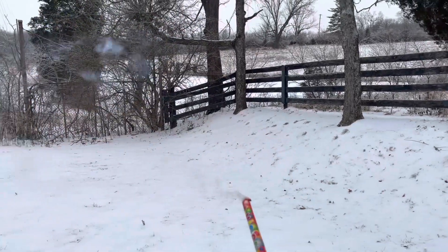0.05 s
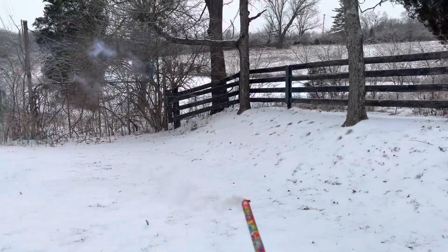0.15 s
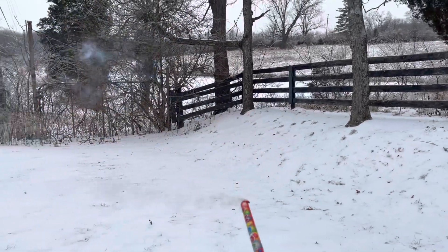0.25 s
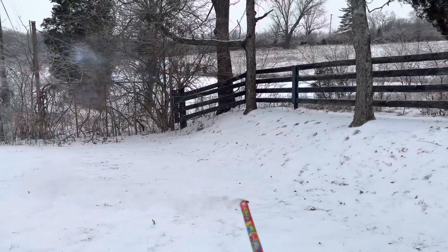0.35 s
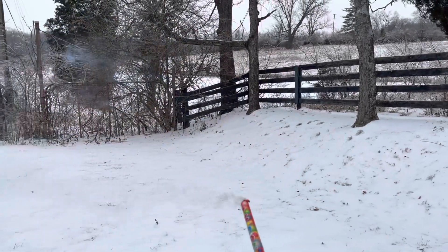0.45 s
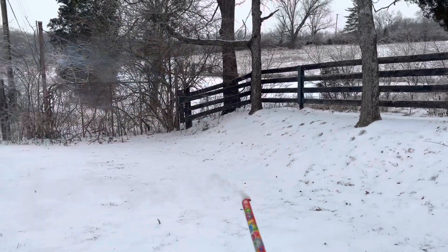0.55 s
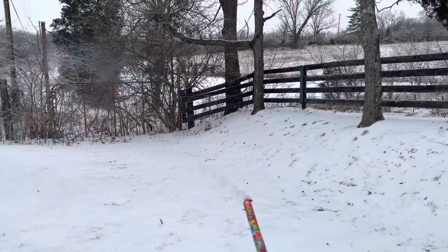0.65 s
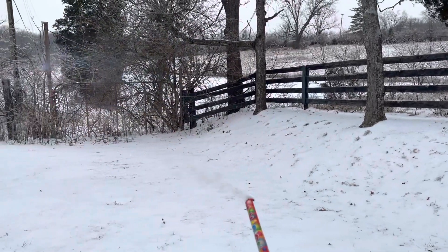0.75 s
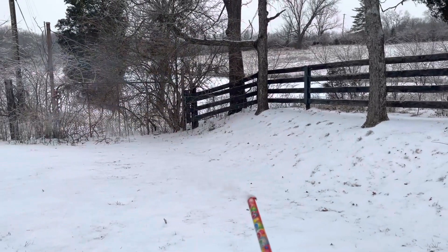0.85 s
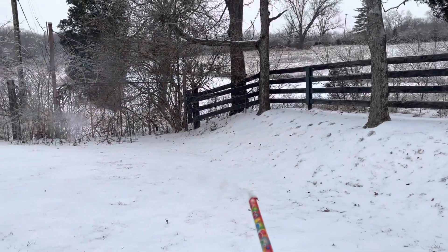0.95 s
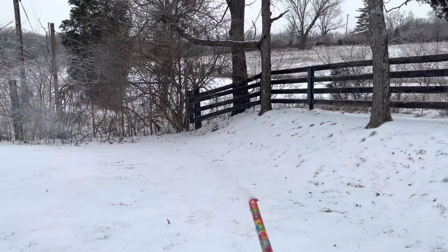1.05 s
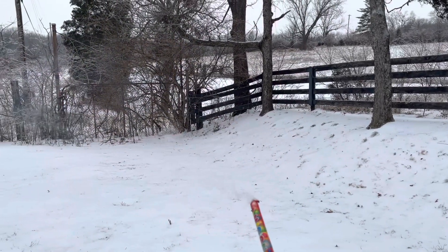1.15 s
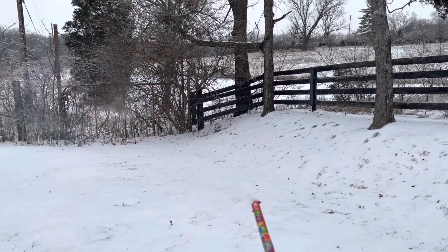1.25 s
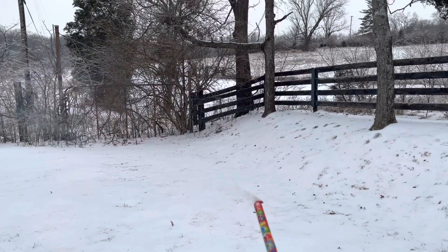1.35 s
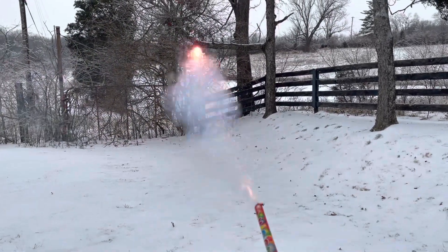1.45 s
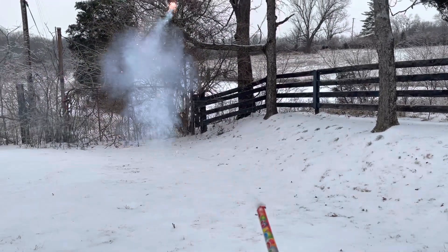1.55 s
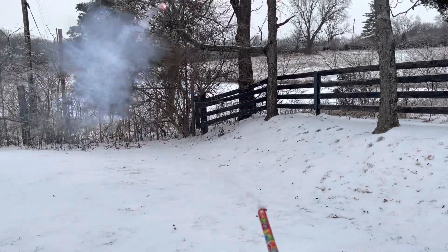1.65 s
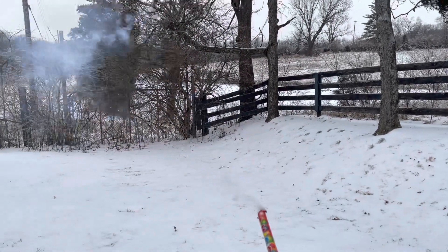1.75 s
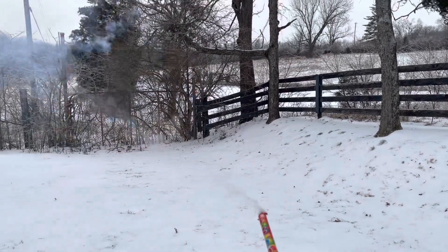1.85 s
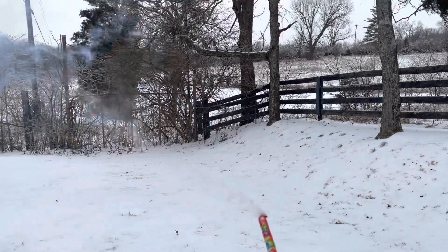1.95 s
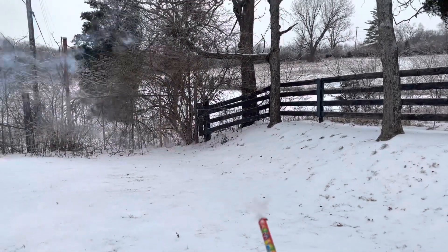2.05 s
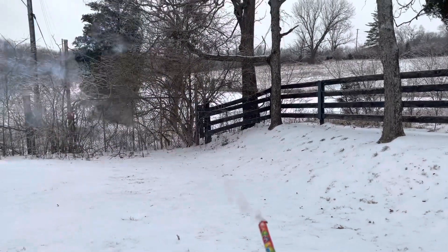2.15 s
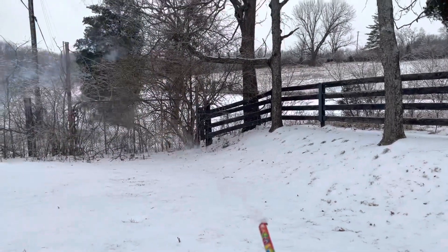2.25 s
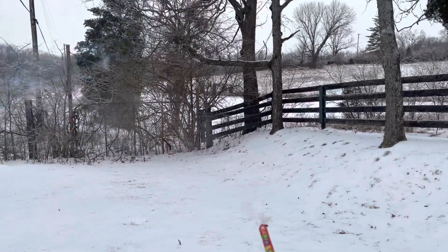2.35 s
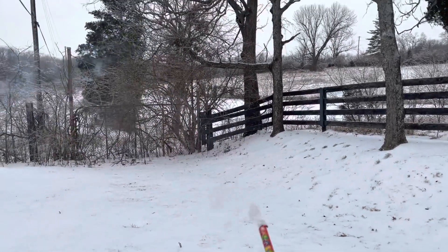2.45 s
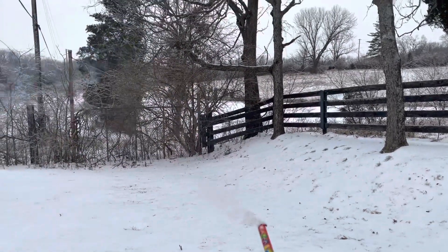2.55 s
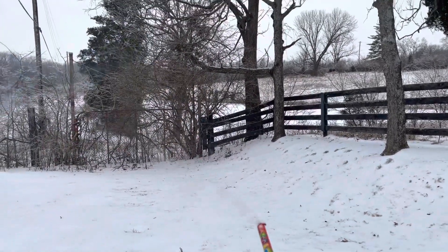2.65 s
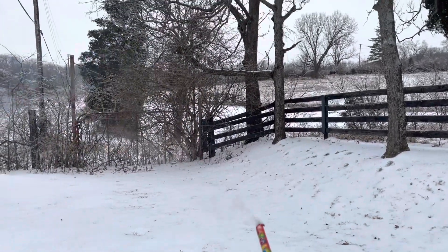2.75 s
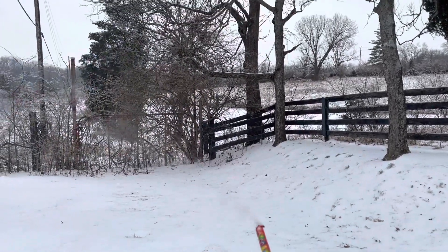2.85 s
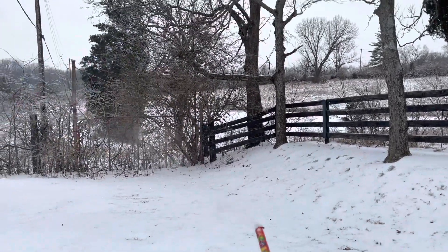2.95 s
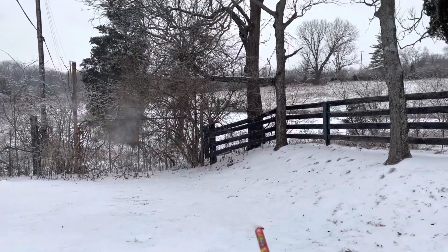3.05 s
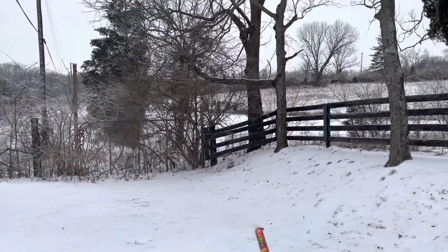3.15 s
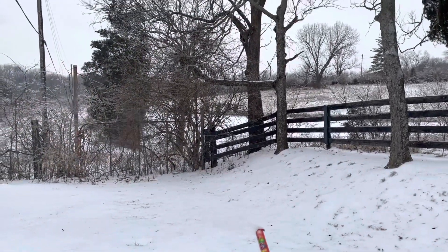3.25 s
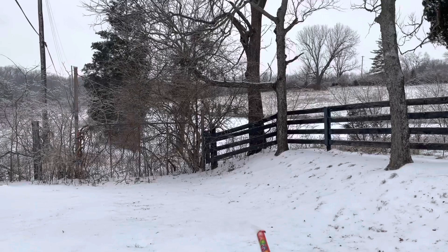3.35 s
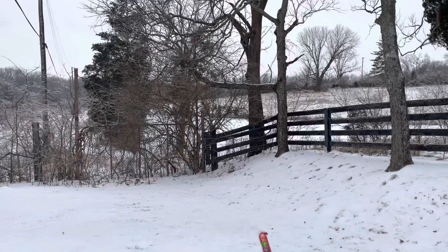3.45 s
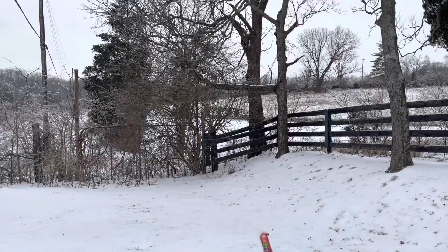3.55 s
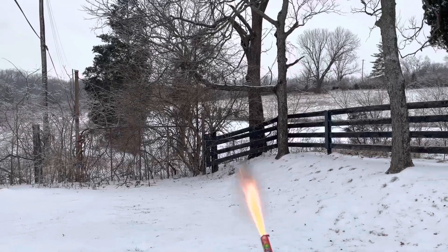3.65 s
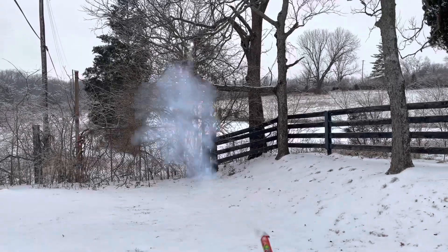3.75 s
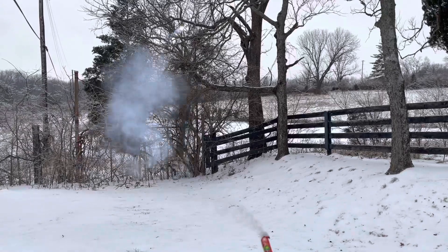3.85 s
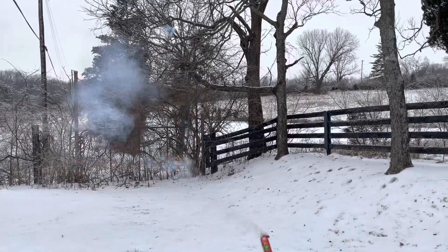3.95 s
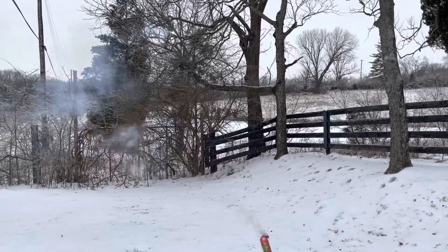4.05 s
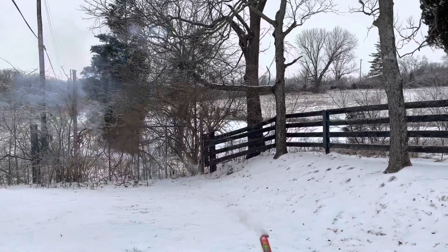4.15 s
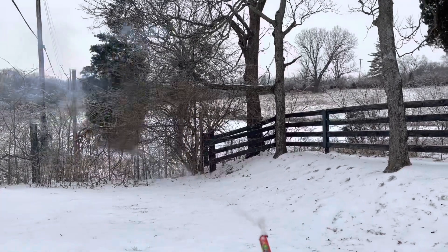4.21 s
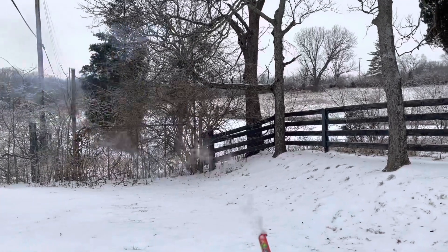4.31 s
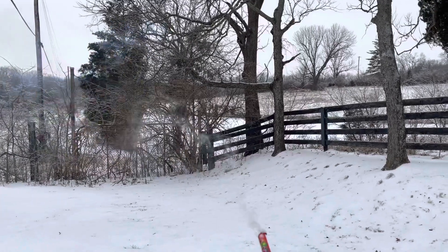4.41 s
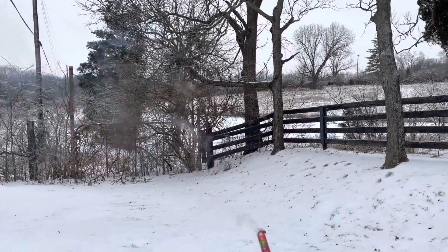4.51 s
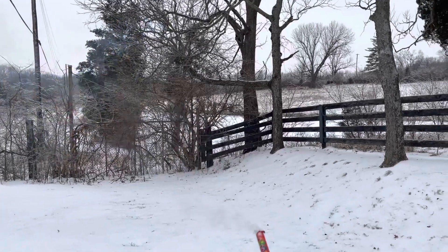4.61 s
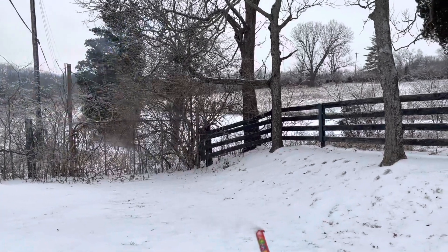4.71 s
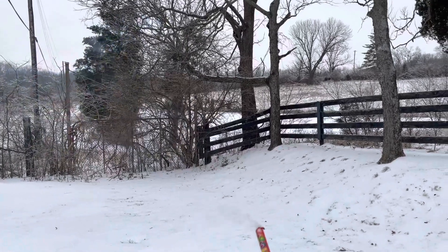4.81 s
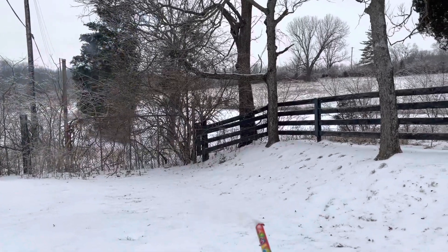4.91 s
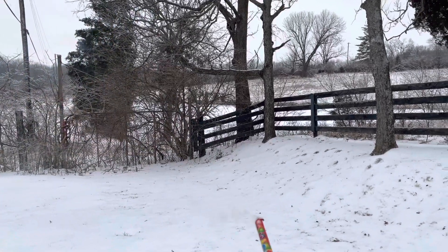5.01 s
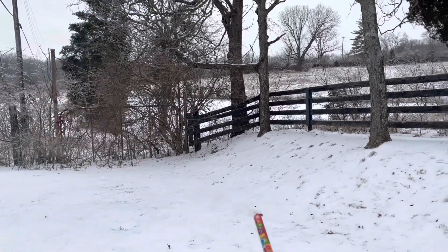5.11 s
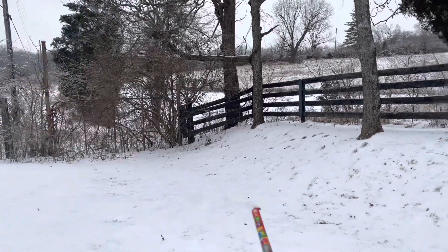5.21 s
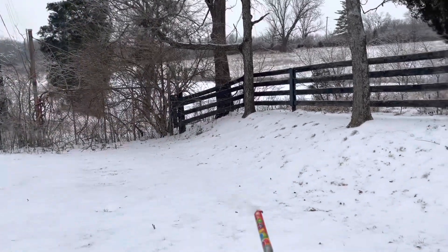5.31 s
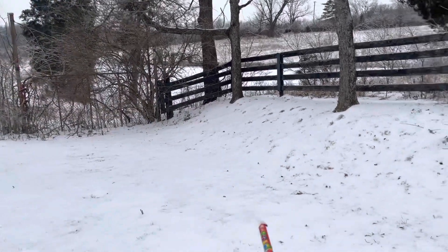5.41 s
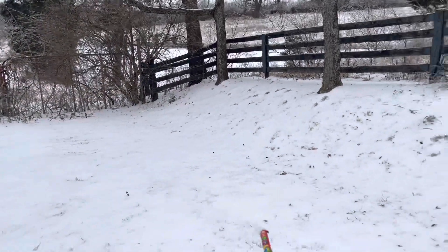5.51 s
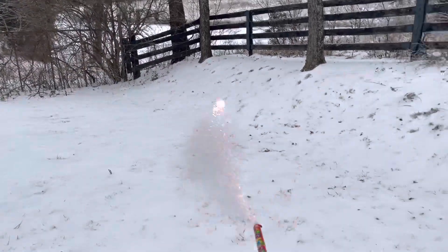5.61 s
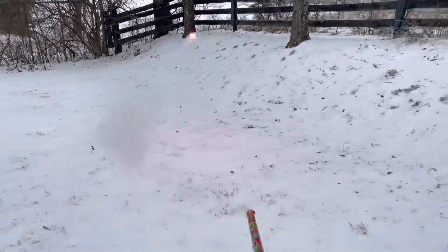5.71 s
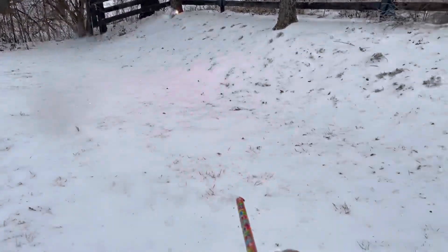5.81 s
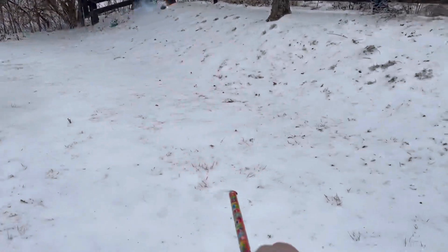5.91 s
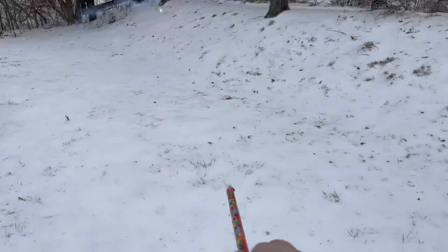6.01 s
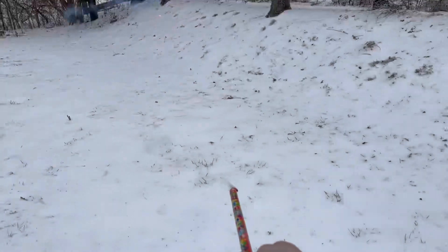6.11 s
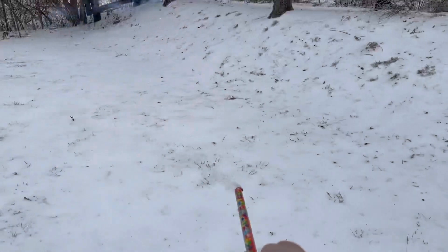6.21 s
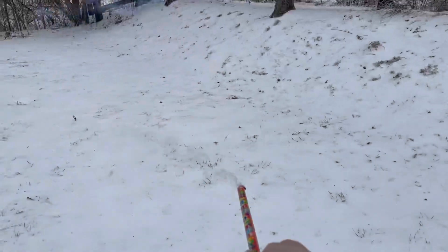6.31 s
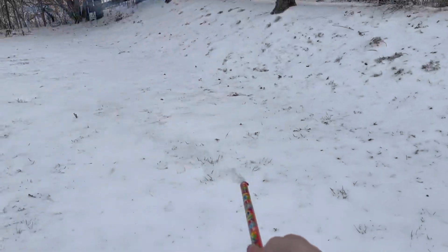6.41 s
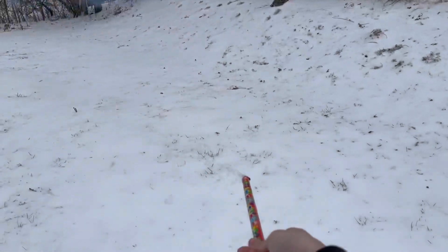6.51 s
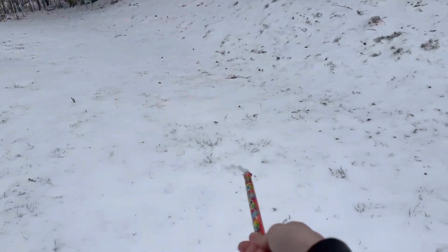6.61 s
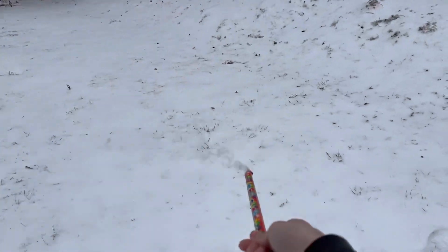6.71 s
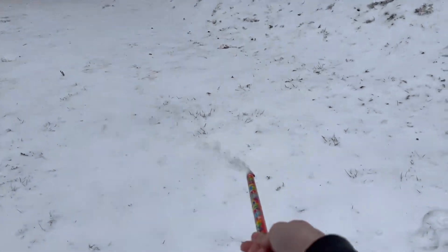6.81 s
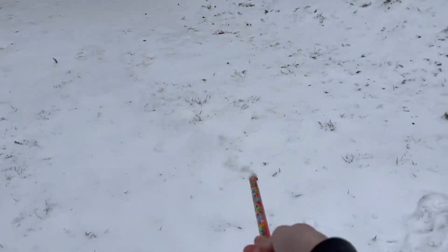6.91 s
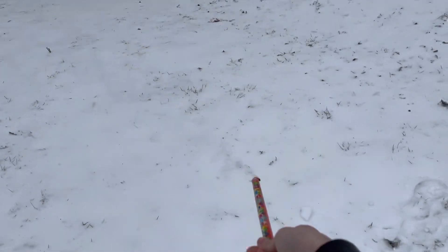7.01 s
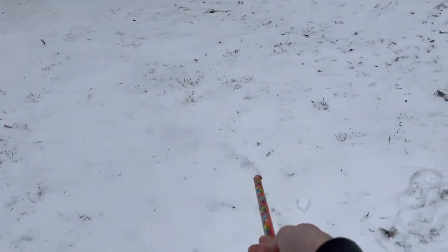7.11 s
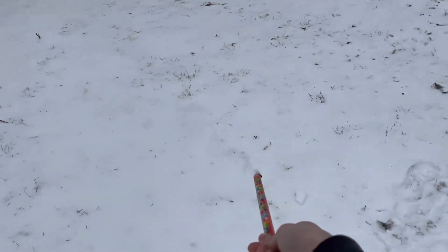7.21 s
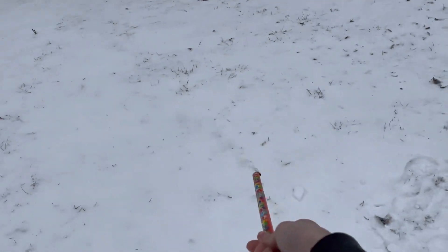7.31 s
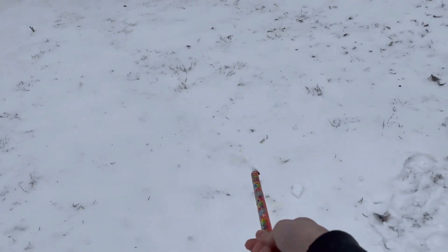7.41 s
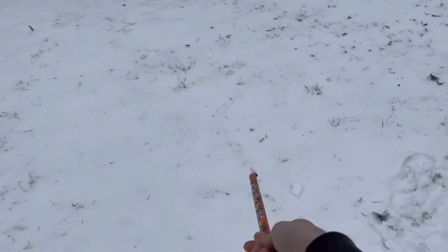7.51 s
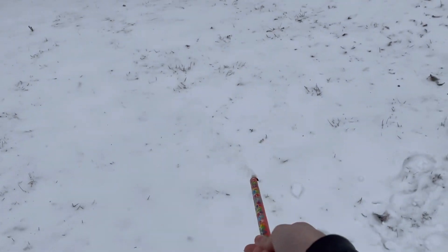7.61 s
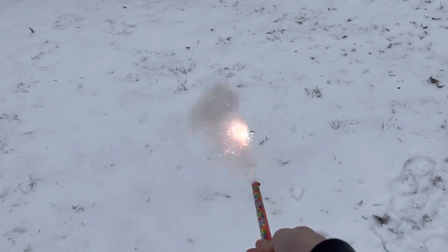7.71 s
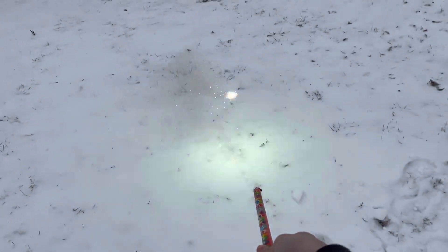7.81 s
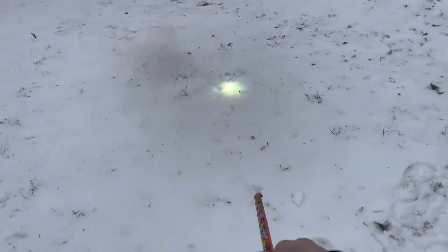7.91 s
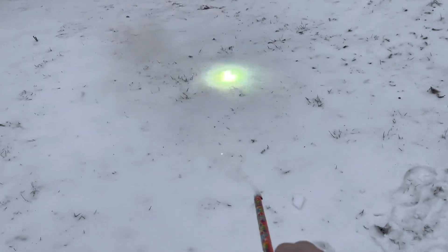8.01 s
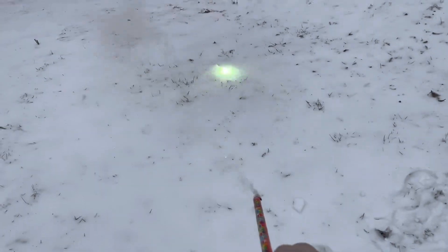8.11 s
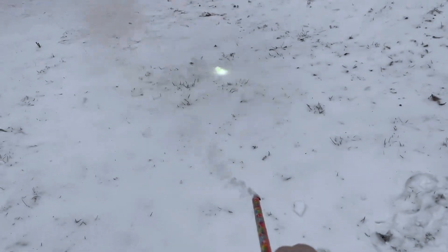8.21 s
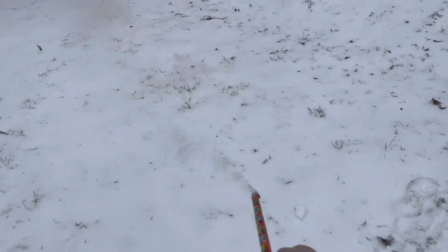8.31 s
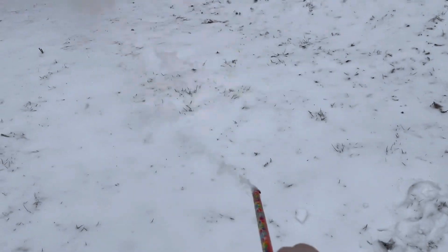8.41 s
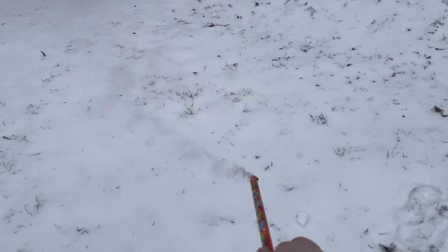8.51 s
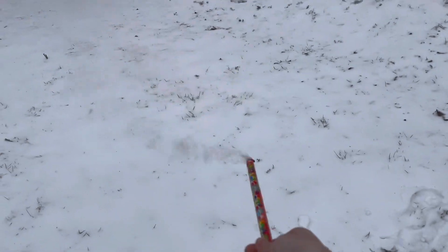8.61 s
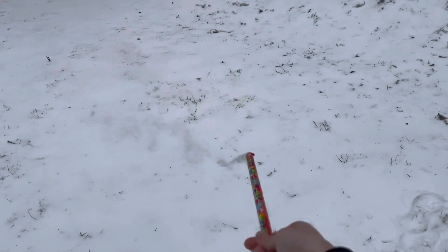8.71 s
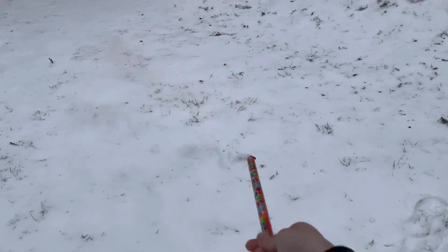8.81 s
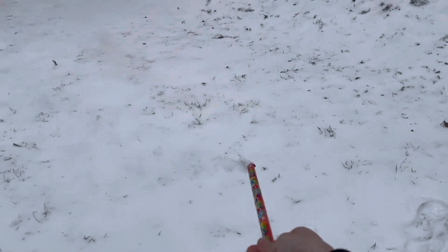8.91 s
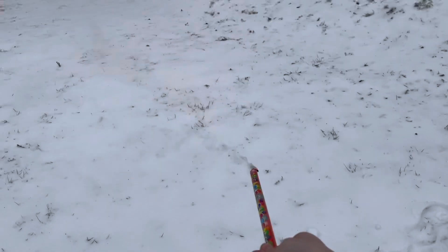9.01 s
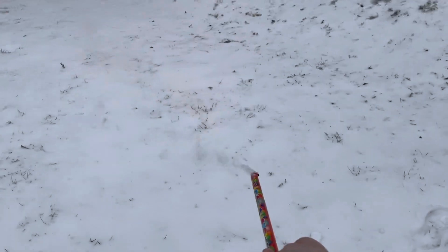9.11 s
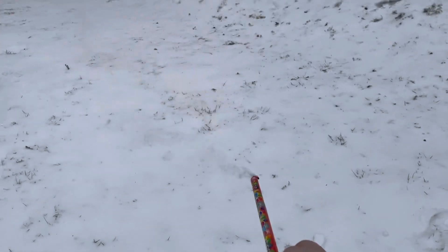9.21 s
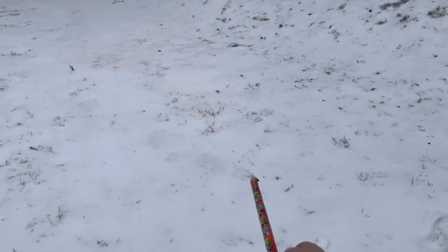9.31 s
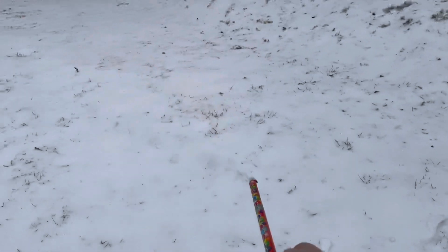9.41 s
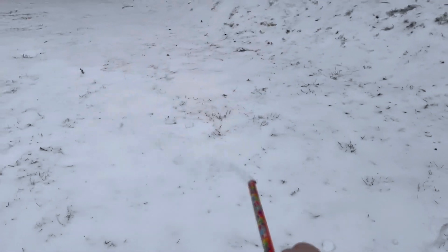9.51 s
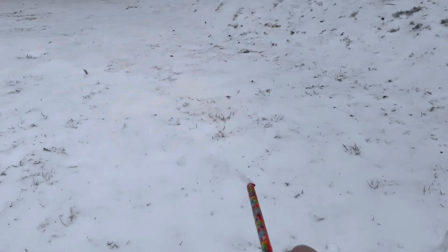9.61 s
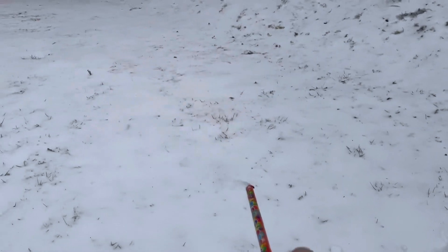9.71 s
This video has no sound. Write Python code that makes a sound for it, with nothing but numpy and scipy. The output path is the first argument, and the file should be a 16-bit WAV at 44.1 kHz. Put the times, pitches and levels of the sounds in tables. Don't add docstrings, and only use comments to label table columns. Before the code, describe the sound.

Outdoors, five abrupt gas pops about two seconds apart punctuate soft burning hiss and spark clicks, while low wind thumps roll over the microphone.

```python
import sys
import numpy as np
from scipy import signal
from scipy.fft import rfft, irfft, next_fast_len
from scipy.io import wavfile
from scipy.ndimage import uniform_filter1d

SR = 44100
rng = np.random.default_rng(int(sys.argv[2]) if len(sys.argv) > 2 else 0)


def level_to_linear(level):
    exponent = np.asarray(level, float) / 20
    return 10 ** exponent


def file_out(sig):
    cols = np.atleast_2d(sig).T
    lim = np.clip(cols, -1, 1)
    pcm = np.round(lim * 32767).astype(np.int16)
    wavfile.write(sys.argv[1], SR, pcm)


N = 429975
T = np.arange(N) / SR

# frequency in Hz, level in dB.
MIC = [(25, -11), (55, 1.5), (4900, -1), (5500, -4), (6100, -0.5), (8500, 7.5), (11800, -1.5),
       (13800, -1.5), (15500, -3.5), (15900, -21.5), (16400, -59.5)]


def shape(x, gain):
    size = next_fast_len(x.shape[-1])
    hz = np.arange(size // 2 + 1) * SR / size + 1e-3
    return irfft(rfft(x, size) * gain(hz), size)[..., :x.shape[-1]]


def colour(table, hz):
    f, db = np.transpose(table)
    return np.interp(np.log(hz), np.log(f), db)


def band(size, lo_hz, hi_hz, channels=1, table=((1, 0), (2, 0)), order=6):
    full = next_fast_len(size)
    phase = rng.random((channels, full // 2 + 1))
    phase = phase[:, :int(8 * hi_hz * full / SR)]
    f = np.arange(phase.shape[1]) * SR / full + 1
    edges = np.sqrt((1 + (lo_hz / f) ** order) * (1 + (f / hi_hz) ** order))
    gain = level_to_linear(colour(table, f)) / edges
    x = irfft(gain * np.exp(2j * np.pi * phase), full)[:, :size]
    return x / x.std()


def walk(rate):
    k = int(SR / rate)
    steps = np.repeat(rng.standard_normal(N // k + 1), k)
    return 1.5 * uniform_filter1d(steps, k)[:N]


def curve(table):
    return np.interp(T, *np.transpose(table))


def bump(s, half):
    out = np.zeros(N)
    near = slice(max(int((s - 4 * half) * SR), 0), int((s + 4 * half) * SR))
    out[near] = np.exp(-((T[near] - s) / half) ** 2)
    return out


def add(out, s, x):
    i = int(s * SR)
    out[..., i:i + x.shape[-1]] += x[..., :N - i]


def fire():
    # start in seconds, star level in dB, star fade in dB per second,
    # burning time in seconds, fuse level in dB.
    stars = [
        (-.7, -72, 12, .3, -66),
        (1.34, -63, 15, .6, -66),
        (3.6, -62, 24, .85, -71),
        (5.52, -67, 10, 1.08, -65),
        (7.62, -61, 15, .64, -69),
    ]
    # time in seconds, lift in dB, half length in seconds, brightness in dB.
    flares = [(.45, 2, .03, 4), (.67, 4, .03, 1), (.96, 7, .04, 3), (1.6, 2, .06, 0), (1.93, 2, .06, -2),
              (3.87, 2, .05, 0), (4.3, 7, .1, -6), (5.75, -1, .09, 6), (6.0, 0.3, .08, 4), (6.5, 3, .2, -3),
              (7.83, 8, .11, 3), (8.17, 3, .08, 6)]
    burn_out_db_per_s, fuse_fade_db_per_s = 60, 13.8
    star_top_db, star_body_db, fuse_top_db, fuse_body_db = 2.5, 5.5, 6.5, 4.5

    columns = np.transpose(stars)
    latest = np.searchsorted(columns[0], T) - 1
    s, star_db, fade, burning_s, fuse_db = columns[:, latest]
    burnt_out = np.maximum(T - s - burning_s, 0)
    star = level_to_linear(star_db - fade * (T - s) - burn_out_db_per_s * burnt_out)
    fuse = level_to_linear(fuse_db - fuse_fade_db_per_s * (T - s))
    lift_db, bright_db = sum(np.outer([db, tilt_db], bump(at, half)) for at, db, half, tilt_db in flares)
    hiss = np.hypot(star, fuse)
    top = level_to_linear(bright_db) * np.hypot(level_to_linear(star_top_db) * star, level_to_linear(fuse_top_db) * fuse)
    body = level_to_linear(-bright_db) * np.hypot(level_to_linear(star_body_db) * star, level_to_linear(fuse_body_db) * fuse)
    return level_to_linear(lift_db) * np.array([hiss, top, body])


def tube(x):
    # start in seconds, quarter-wave pitch in Hz,
    # seconds until the star's plain hiss gives way to the ringing fuse.
    lengths = [
        (0, 1150, 0),
        (1.33, 960, 0.49),
        (3.58, 855, 0.47),
        (5.511, 718, 0.57),
        (7.601, 632, .7),
    ]
    return_share, dull_hz = .45, 9000
    out = np.zeros(N)
    ends = [row[0] for row in lengths[1:]] + [N / SR]
    for (s, hz, open_s), end in zip(lengths, ends):
        part = x[int(s * SR):int(end * SR)]
        back = lambda f: return_share * np.exp(-(f / dull_hz) ** 2 - 1j * np.pi * f / hz)
        rung = shape(part, lambda f: np.sqrt(1 - abs(back(f)) ** 2) / (1 + back(f)))
        share = np.clip((np.arange(len(part)) / SR - open_s) / 0.37 + .5, 0, 1)
        add(out, s, share * rung + (1 - share) * part)
    return out


def burning():
    # time in seconds, peak level in dB, centre frequency in Hz.
    sparks = [(1.3724, -32.5, 12000), (2.5794, -56, 6570), (5.7309, -24.5, 8000), (6.2667, -44.5, 6900),
              (6.3949, -46, 4510), (7.168, -55, 6040), (7.3094, -56, 5570), (7.7762, -34.5, 12000),
              (8.0162, -38, 6000), (8.6717, -43, 10100), (8.9052, -62.5, 8000), (9.017, -61, 2490),
              (9.5797, -59.5, 9040), (9.662, -56, 13000)]
    snow_delay_s, snow_share = [.0041, .0046], .03
    hiss, top, body = fire()
    flicker = level_to_linear(0.7 * walk(25) + 1.5 * walk(240))
    flame = 1.2 * hiss * band(N, 3700, 9500)[0]
    flame = flame + body * band(N, 1200, 3500)[0]
    flame = flame + top * band(N, 9500, 17000)[0]
    out = tube(flicker * flame)
    click = signal.unit_impulse(256, 64)
    for s, db, hz in sparks:
        spark = shape(click, lambda f: 1 / (1 + (hz / 2.3 / f) ** 4) / (1 + (f / hz / 2.2) ** 4))
        add(out, s - .001, level_to_linear(db + 3.5) * spark / spark.max())
    return shape(out, lambda f: 1 + snow_share * np.exp(-2j * np.pi * np.outer(snow_delay_s, f)))


def buffeting():
    # time in seconds, level in dB.
    gust = [(0.0, -48), (0.94, -55), (1.65, -43), (1.97, -48), (2.19, -64), (2.62, -53), (3.02, -64),
            (4.02, -49), (4.43, -50), (4.73, -59), (5.27, -58), (5.62, -52), (6.05, -58), (8.08, -53),
            (8.32, -58), (8.75, -50), (9.29, -60), (9.7, -54)]
    # time in seconds, rumble in dB, half length in seconds, flutter over rumble in dB.
    puffs = [(.11, -38, .05, -9), (.5, -43, .06, -9), (.67, -42, .03, -9), (1.07, -37, .04, -12),
             (1.43, -39, .03, -15), (1.52, -38, .03, -10), (1.6, -35, .04, -12), (1.8, -32, .025, -12),
             (2.0, -42, .03, -9), (2.16, -35, .04, -17), (2.48, -42, .05, -12), (3.51, -42, .04, -10),
             (4.13, -38, .06, -8), (4.35, -41, .03, -12), (4.43, -42, .03, -12), (4.57, -38, .035, -14),
             (4.95, -47, .04, -7), (5.2, -48, .06, -5), (5.72, -41, .08, -4), (5.88, -44, .03, -5),
             (6.06, -44, .04, -7), (6.33, -41, .05, -9), (6.56, -41, .035, -10), (7.0, -36, .03, -15),
             (7.14, -42, .05, -6), (7.4, -41, .03, -12), (7.96, -38, .045, -10), (8.13, -43, .04, -7),
             (8.56, -41, .05, -13), (8.67, -42, .06, -3)]
    gust_flutter_db = -5.5
    power = np.outer(level_to_linear(np.array([0, gust_flutter_db])), level_to_linear(curve(gust) + 1.5)) ** 2
    for s, db, half, flutter_db in puffs:
        power = power + np.outer(level_to_linear(db + np.array([0, flutter_db])), bump(s, half)) ** 2
    return np.sqrt(power)


def wind():
    # time in seconds, peak level in dB, first pitch in Hz,
    # left minus right in dB.
    slaps = [(0.11, -35, 360, .5), (1.054, -38, 248, 6), (1.219, -34.5, 354, 1), (1.27, -26.5, 400, 2),
             (1.419, -28, 239, 1), (1.620, -28, 437, 3), (1.639, -34, 606, -1.5), (1.671, -26, 789, 7),
             (1.682, -27.5, 501.4, -9), (1.784, -18, 826, 3.5), (1.891, -33.5, 353, 4),
             (1.997, -40, 298, -2), (2.112, -35, 250, -3), (2.49, -38, 250, -1.5),
             (2.685, -40.5, 300, -0.5), (4.097, -28, 219, -0.5), (4.131, -26.5, 294, 2.5),
             (4.169, -31.5, 248, 7), (4.335, -34, 170, -1), (4.414, -33, 201, 1), (4.548, -34, 148, -1),
             (6.307, -37, 253, -2), (7.243, -36, 298, -2), (8.513, -34, 202, 1), (8.856, -28, 370, 3),
             (8.762, -37, 260, 0), (7.55, -37, 280, 0), (8.375, -38, 170, 0), (9.036, -43.5, 398, 3),
             (9.101, -41.5, 498, 0.5)]
    low, high = buffeting()
    share = np.array([[.8, 0.69, 0], [.8, 0, 0.81]])
    rumble = share @ band(N, 38, 100, channels=3) * level_to_linear(2.1 * walk(14))
    flutter = share @ band(N, 130, 300, channels=3) * level_to_linear(2.7 * walk(45))
    out = low * rumble / rumble.std() + high * flutter / flutter.std()
    t = np.arange(SR // 12) / SR
    for s, db, hz, pan_db in slaps:
        turns = np.cumsum(80 + 1.2 * hz * np.exp(-t / .005)) / SR
        swell = np.exp(-t / .017) * (1 - np.exp(-(t / .0022) ** 2))
        slap = np.sin(2 * np.pi * turns) * swell
        sides_db = np.array([[pan_db], [-pan_db]]) / 2
        add(out, s + 0.00077, level_to_linear(db + 1.0 + sides_db) * slap)
    return out


def distance():
    # frequency in Hz, level in dB per Hz.
    traffic = [(60, -29.5), (110, -2.5), (290, -6), (550, -9), (760, -6.5), (1100, -13.5), (1600, -19.5),
               (2300, -26.5), (2900, -39), (5000, -60.5)]
    # time in seconds, level in dB.
    traffic_level = [(0, -65), (1.6, -62), (3.6, -61), (4.5, -64), (5.7, -62.5), (7.2, -66), (9.75, -67.5)]
    # time in seconds, level in dB, half length in seconds.
    hum_drifts = [
        (6.3, -59, .2),
        (7.0, -61, .25),
        (7.5, -63, .2),
        (8.3, -59, .2),
        (8.62, -59, .22),
        (9.4, -70, .25),
    ]
    drone_hz, drone_db, drone_leaves_s, drone_fade_db_per_s = 742, -63, 3.3, 3.1
    hum_hz = 472
    out, swell = 0, walk(0.48)
    wide = np.array([[1, 1.0], [1, -0.88]])
    for hz in 100 * 2 ** np.arange(6):
        db = colour(traffic, hz) + .4 * swell + walk(6)
        octave = wide @ band(N, hz / 1.41, hz * 1.41, channels=2, table=traffic)
        out = out + level_to_linear(db) * np.sqrt(hz) * octave
    fading = level_to_linear(drone_db - drone_fade_db_per_s * np.maximum(T - drone_leaves_s, 0) + 1.2 * walk(5))
    drone = fading * (wide @ band(N, drone_hz - 5, drone_hz + 8, channels=2, order=60))
    hum_level = sum(level_to_linear(db) * bump(s, half) for s, db, half in hum_drifts) * level_to_linear(0.87 * walk(9))
    hum = hum_level * np.sin(2 * np.pi * np.cumsum(hum_hz + 1.4 * walk(4)) / SR)
    return level_to_linear(curve(traffic_level) + 9.0) * out / out.std() + drone + hum


def blasts():
    # time of full pressure in seconds, level in dB, then build-up, length and dying-away in seconds.
    shots = [
        (1.3266, -9, .0025, .013, .0032),
        (3.5792, -9.5, .0022, .013, 0.004),
        (5.508, -9, .002, .010, 0.0014),
        (7.597, -17.5, 0.0047, 0.0071, 0.0011),
        (7.606, -12.5, 0.00038, .012, .003),
        (9.7319, -10.5, 0.0032, 0.012, 0.0033),
    ]
    # frequency in Hz, level in dB per Hz.
    spectrum = [(40, -6.5), (120, -1), (400, -0.5), (1000, -3.5), (1500, -6.5), (2800, -7), (4500, -21),
                (7000, -16), (11000, -17.5), (16000, -23)]
    # delay in seconds, level in dB, dying-away in seconds,
    # tilt in dB per octave.
    echoes = [(.038, -28, 0.011, 0), (0.0088, -35, 0.028, -0.8), (.06, -53, .12, -1.5)]
    # centre in Hz, width in Hz,
    # share removed.
    gaps = [(620, 90, .7), (1430, 130, .7)]
    late_s_per_octave, make_up_db = 0.00099, .3
    after_db, after_dull_db, after_stretch = -11.5, -2, 3.7

    out = np.zeros(N)
    t = np.arange(SR // 3) / SR - .05
    bands_hz = 35 * 2 ** np.arange(0, 9.3, .5)
    weight = level_to_linear(colour(spectrum, bands_hz)) * np.sqrt(bands_hz)
    weight = weight / np.sqrt(np.sum(weight ** 2))
    for s, db, build, length, fall in shots:
        after = (length, after_db, after_stretch * fall, after_dull_db)
        for hz, w in zip(bands_hz, weight):
            octave = np.log2(hz / 1000)
            u = t + late_s_per_octave * min(octave - 1, 0)
            past_end = np.maximum(u - length + 0.00037 * max(octave, 0), 0)
            env = np.exp(np.minimum(u / build, 0) - past_end / fall)
            env = env * np.where(u < 0, 0.42 * (u > -3.5 * build), 1)
            for lag, echo_db, tail, dull_db in [after] + echoes:
                echo = level_to_linear(echo_db + dull_db * octave) * (u > lag) * np.exp(-np.abs(u - lag) / tail)
                env = np.hypot(env, echo)
            gas = env * band(len(t), hz / 1.19, hz * 1.19)[0]
            steady = np.sqrt(np.sum(env ** 2) / np.sum(gas ** 2))
            add(out, s + t[0], w * level_to_linear(db + 0.25 * octave) * gas * steady)

    def bounce(f):
        removed = sum(share * np.exp(-((f - hz) / width) ** 2) for hz, width, share in gaps)
        return level_to_linear(make_up_db) * (1 - removed)
    return shape(out, bounce)


def bird():
    # start in seconds, length in seconds, first pitch in Hz, last pitch in Hz, level in dB.
    chirps = [
        (7.17, 0.022, 6000, 7200, -77.5),
        (8.51, 0.015, 5500, 7300, -67.5),
        (8.536, .012, 8170, 8900, -75.5),
        (8.807, 0.043, 6200, 8700, -70),
    ]
    out = np.zeros(N)
    for s, length, first_hz, last_hz, db in chirps:
        u = np.linspace(0, 1, int(length * SR))
        turns = np.cumsum(first_hz + (last_hz - first_hz) * u ** .7) / SR
        add(out, s, level_to_linear(db) * np.sqrt(np.sin(np.pi * u)) * np.sin(2 * np.pi * turns))
    return out


def ports(x):
    # frequency in Hz, phase by which left leads in radians.
    port_phase = [(0, 0), (860, .4), (1400, .15), (3700, 1.0), (5300, 1.25), (5800, -1.6), (6700, -.6),
                  (7400, -2.3), (8000, -3.05), (9200, -3.25), (9900, -3.9), (11200, -5), (12200, -6.15),
                  (13000, -6.28)]
    hz, lead = np.transpose(port_phase)
    return shape(x, lambda f: level_to_linear(colour(MIC, f)) * np.exp(.5j * np.outer([1, -1], np.interp(f, hz, lead))))


def scene():
    mic_hiss = level_to_linear(-82.3) * band(N, 4000, 22000, table=[(5000, -4.5), (13500, 1.0)])[0]
    ahead = ports(burning() + blasts() + mic_hiss)
    around = wind() + distance() + bird()
    return ahead + shape(around, lambda f: level_to_linear(colour(MIC, f)))


def roll_off(x):
    return signal.sosfilt(signal.butter(12, 16670, fs=SR, output="sos"), x)


def record(dry):
    rounded = np.tanh(0.95 * dry) / 0.89
    return roll_off(rounded)


dry = scene()
out = record(dry)
file_out(out)
```